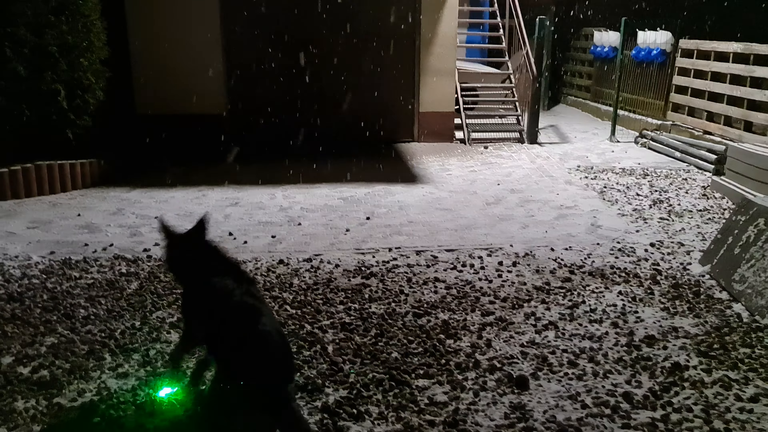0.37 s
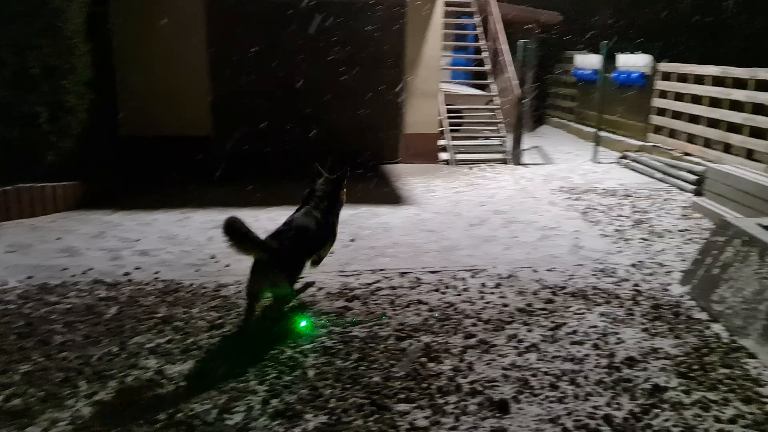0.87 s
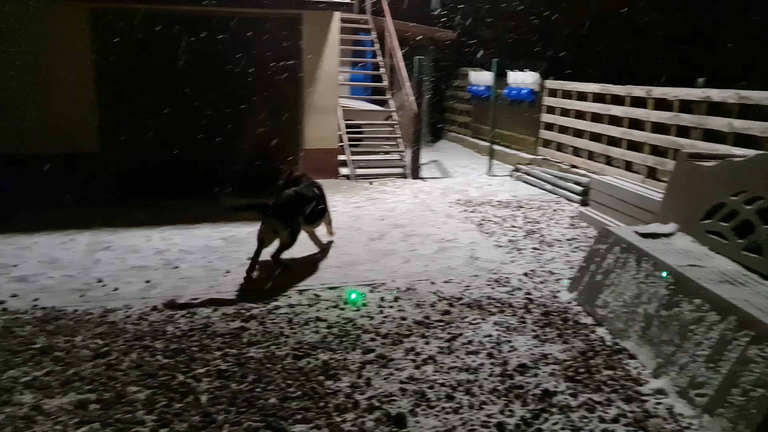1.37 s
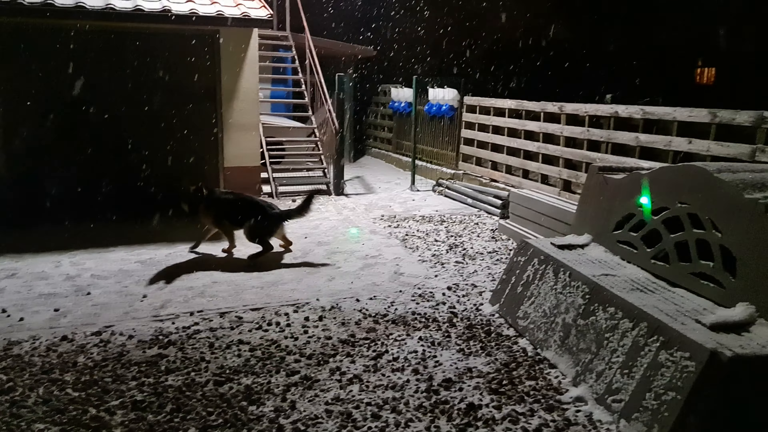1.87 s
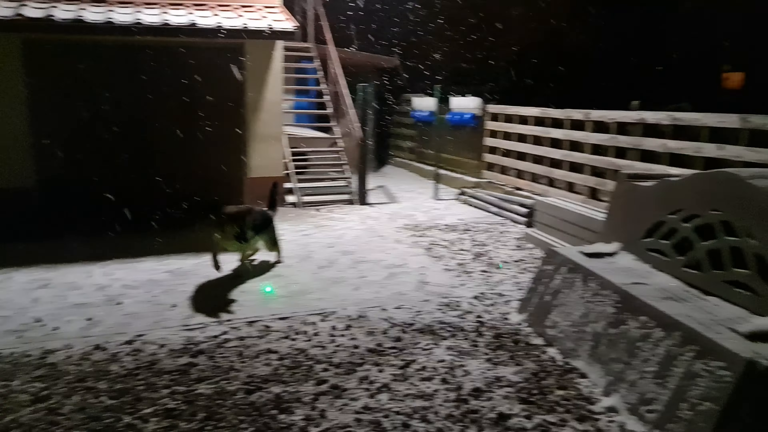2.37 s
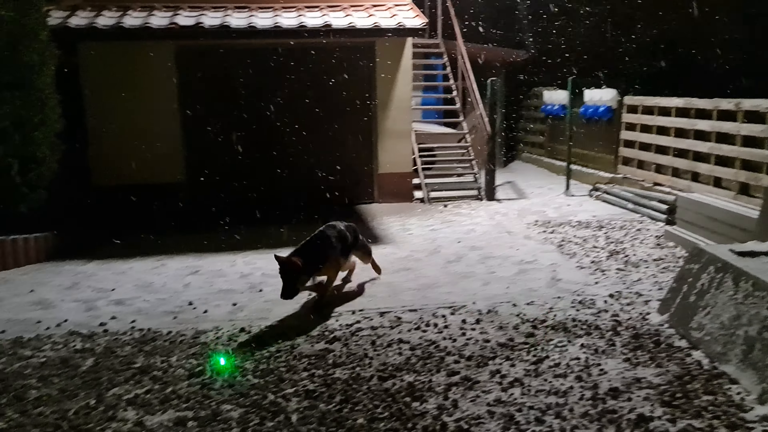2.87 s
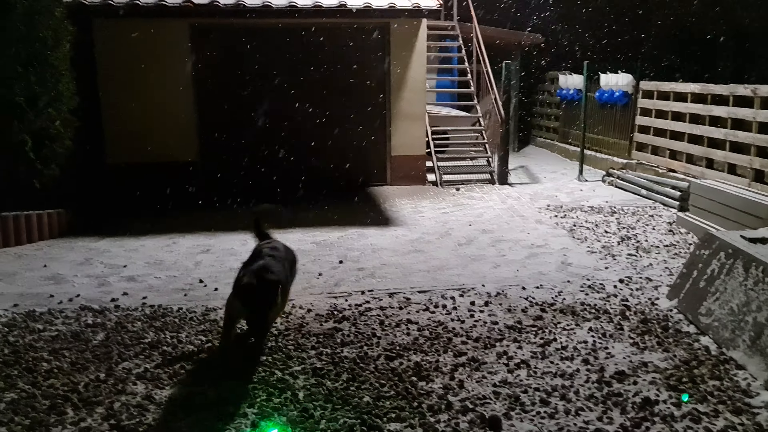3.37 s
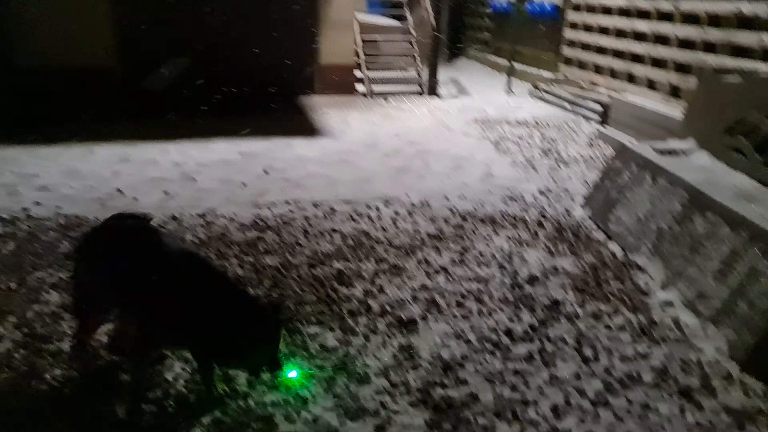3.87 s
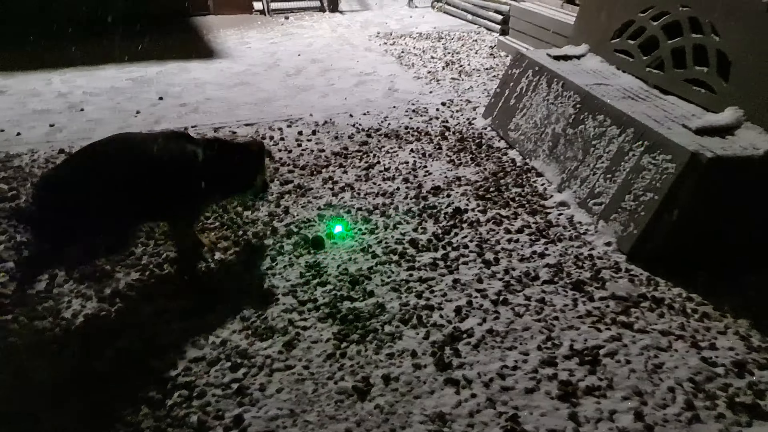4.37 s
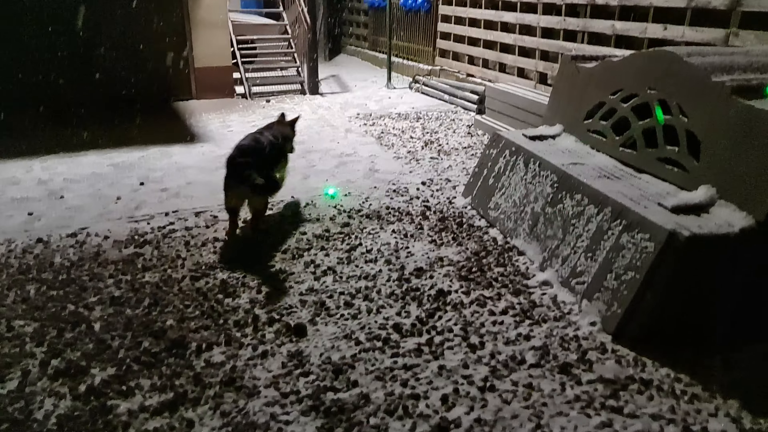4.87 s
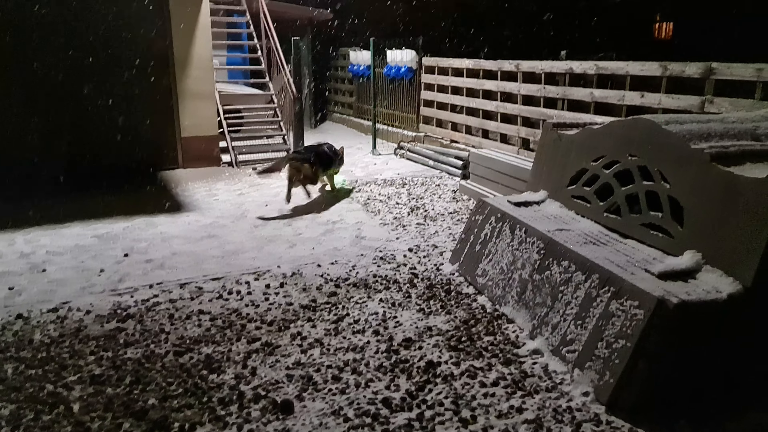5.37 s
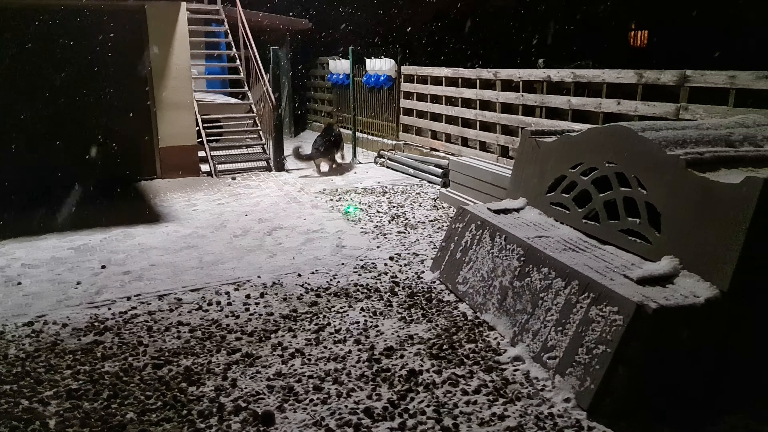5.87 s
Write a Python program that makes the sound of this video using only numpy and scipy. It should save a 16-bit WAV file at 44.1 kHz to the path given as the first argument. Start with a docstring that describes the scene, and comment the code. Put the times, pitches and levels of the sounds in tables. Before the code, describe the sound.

A dog scrambles noisily over snow-dusted gravel close by, runs off into near silence, then returns for a second crunching burst and fades away.

```python
"""Dog chasing about a walled yard at night

A dog runs over gravel under thin fresh snow: each step is grains set ringing, gravel bright and snow dull.
Near, its paws scatter stones that crunch and click, as short bursts into resonances, and its pads thud.
Far off the grains merge, and each step is a soft short hiss. Walls and fences scatter a little of it back.
Light wind, lumpy low noise, rumbles on the two microphone ports over a faint night floor of shaped noise."""
import sys
import numpy as np
from scipy import signal
from scipy.fft import rfft, irfft
from scipy.io import wavfile

SR = 44100
rng = np.random.default_rng(int(sys.argv[2]) if len(sys.argv) > 2 else 0)


def pcm_store(signal):
    """Save signal as 16-bit PCM."""
    levels = np.round(np.clip(np.atleast_2d(signal), -1, 1) * 32767)
    wavfile.write(sys.argv[1], SR, levels.astype(np.int16).T)


def level_to_linear(level):
    """Convert decibel levels to linear amplitude factors, elementwise."""
    exponent = np.asarray(level, float) / 20
    return 10 ** exponent


N = 275184
TIME = np.arange(N) / SR
LOW_EXTRA_LAG_MS = 0.26   # long waves bend round the body and lag more


def rms_one(x):
    """Scale to rms 1, all channels together."""
    return x / np.sqrt(np.mean(x ** 2) + 1e-20)


def peak_one(x):
    """Scale each row to peak 1."""
    return x / np.abs(x).max(axis=-1, keepdims=True)


def in_time(rows):
    """Each column after the first, the time, as a curve over all samples."""
    s, *columns = np.transpose(rows)
    return [np.interp(TIME, s, column) for column in columns]


def drift(corner_hz):
    """Slow chance of spread 1: noise through two equal poles, made at a fortieth of the sample rate."""
    pole = np.exp(-80 * np.pi * corner_hz / SR)
    white = rng.standard_normal(N // 40 + 2002)
    slow = signal.lfilter([1], [1, -2 * pole, pole * pole], white)[2000:]
    return np.interp(np.arange(N) / 40, np.arange(len(slow)), rms_one(slow))


def ring(x, hz, cycles):
    """A resonance that dies by 60 dB in so many cycles; a unit click rings at height about 1."""
    pole = level_to_linear(-60 * hz / (cycles * SR))
    w = 2 * np.pi * hz / SR
    return signal.lfilter([0, np.sin(w)], [1, -2 * pole * np.cos(w), pole * pole], x + 1e-18)


def above(x, hz):
    """Steep high-pass."""
    return signal.sosfilt(signal.butter(4, hz, "high", fs=SR, output="sos"), x)


def band(x, order, low_hz, high_hz):
    """Band-pass."""
    return signal.sosfilt(signal.butter(order, [low_hz, high_hz], "band", fs=SR, output="sos"), x)


def colour(x, spectrum):
    """Filter by a curve of (Hz, dB) points, read on a log-frequency axis."""
    hz = np.maximum(np.fft.rfftfreq(N, 1 / SR), 1)
    point_hz, point_db = np.transpose(spectrum)
    return irfft(rfft(x) * level_to_linear(np.interp(np.log(hz), np.log(point_hz), point_db)), N)


def at_ports(x, lag_ms):
    """Sound from one side reaches the right port a little later than the left."""
    return np.array([x, np.interp(TIME - lag_ms / 1000, TIME, x)])


def grains(per_s, spread_db, low_hz, high_hz, cycles, crack_db, count):
    """Random clicks of uneven size: each is a broad crack plus a ring in one of several resonances."""
    sizes = level_to_linear(spread_db * np.minimum(rng.exponential(1, N), 4)) * rng.choice([-1, 1], N)
    clicks = sizes * (rng.random(N) < per_s / SR) / np.sqrt(per_s)
    dealt = rng.integers(0, count, N)
    rings = 0
    for k, hz in enumerate(np.geomspace(low_hz, high_hz, count)):
        # grains of each size come and go on their own, so the colour shifts
        presence = hz * level_to_linear(4.9 * drift(13))
        rings = rings + presence * ring(clicks * (dealt == k), hz, cycles)
    scrape = irfft(np.exp(2j * np.pi * rng.random(20)))   # a contact lasts about a millisecond
    cracks = np.convolve(clicks, scrape, "same")
    return rms_one(rings) + level_to_linear(crack_db) * rms_one(cracks)


def knock(burst_ms):
    """Ragged bursts, one per row: the contact builds, peaks after burst_ms, then lets go."""
    t = np.arange(4096) / (np.reshape(burst_ms, (-1, 1)) * SR / 1000)
    return rng.standard_normal(t.shape) * t * np.exp(-t)


def lay(times, peaks_db, sounds):
    """Place each sound at its start time and peak height."""
    out = np.zeros(N + sounds.shape[1])
    for s, db, sound in zip(times, peaks_db, peak_one(sounds)):
        out[round(s * SR):][:len(sound)] += level_to_linear(db) * sound
    return out[:N]


def footfalls():
    """Gravel and snow levels in dB: steps swell, sag under the weight, die as the paw lifts; powers add."""
    # Each paw coming down. Each row: landing in seconds, press in seconds, gravel crunch in dB,
    # snow squeeze in dB.
    steps = [(.01, 0.021, -34.5, -42.5), (0.044, 0.048, -26, -34), (0.131, 0.075, -22.5, -30.5),
             (0.249, 0.1, -28, -37.5), (0.392, 0.05, -25.5, -35), (0.482, .07, -31.5, -44.5),
             (0.588, 0.078, -39.5, -45.5), (0.679, .05, -50.5, -51), (0.762, 0.026, -52, -46),
             (.82, 0.022, -53.5, -50.5), (0.936, 0.023, -61, -57.5), (1.012, 0.038, -56.5, -57.5),
             (1.129, 0.012, -66.5, -58.5), (1.251, 0.071, -59, -66), (1.451, 0.15, -63, -61.5),
             (1.56, 0.058, -54.5, -56.5), (1.66, .05, -59.5, -69), (1.79, 0.1, -69, -73),
             (1.869, 0.075, -57, -69.5), (1.977, 0.13, -55, -60.5), (2.208, 0.019, -65.5, -69),
             (2.586, 0.044, -52, -62), (2.732, 0.022, -65, -67), (2.884, 0.053, -58.5, -67.5),
             (3.06, .09, -68, -79), (3.173, 0.018, -57, -67), (3.313, 0.071, -57.5, -55),
             (3.508, .05, -59, -60), (3.681, .02, -41, -44.5), (3.712, 0.086, -26.5, -33.5),
             (3.86, 0.062, -39.5, -43.5), (3.972, 0.059, -33, -45.5), (4.074, 0.043, -31, -39),
             (4.173, .1, -35.5, -44), (4.301, .14, -35, -40.5), (4.458, 0.055, -42.5, -50),
             (4.533, 0.028, -33, -46), (4.564, 0.052, -36, -43.5), (4.66, 0.057, -46.5, -53.5),
             (4.779, 0.029, -52.5, -57.5), (4.858, 0.024, -61, -55), (4.916, 0.023, -62, -56),
             (4.98, .04, -66.5, -70), (5.072, 0.028, -61, -63), (5.152, 0.096, -69, -62.5),
             (5.286, 0.06, -62, -64.5), (5.52, 0.064, -66, -63), (5.632, 0.052, -61.5, -58.5),
             (5.721, 0.18, -59, -65), (5.828, 0.072, -57, -59), (5.931, 0.085, -56.5, -62.5),
             (6.06, .2, -62, -87)]
    lands, presses, crunch_db, squeeze_db = np.transpose(steps)[:, :, None]
    settling_db = -77.5   # loose grit never lies quite still
    coarse = TIME[::40]
    t = coarse - lands
    curves = []
    # rise, sag and release in dB per s
    for step_db, rise, sag, release in [(crunch_db, 1100, 9.6, 300), (squeeze_db, 1500, 41, 200)]:
        loss_db = rise * np.maximum(-t, 0) + sag * np.clip(t, 0, presses)
        loss_db = loss_db + release * np.maximum(t - presses, 0)
        power = np.sum(level_to_linear(step_db - loss_db) ** 2, axis=0) + level_to_linear(settling_db) ** 2
        curves.append(np.interp(TIME, coarse, 10 * np.log10(power)))
    return curves


def gravel(level_db, lag_ms, distance, sheen_db):
    """Three patches under the paws, each from its own direction; from afar the grains merge into hiss."""
    # Colour of the gravel. Each row: frequency in Hz, relative level in dB.
    gravel_colour = [(410, -15.5), (700, 2.5), (865, -5.5), (1000, -2.5), (1680, 2), (2180, 1), (2880, 0),
                     (3650, 4), (6300, 4), (9220, -14.5), (14500, -11), (16500, -64.5)]
    busy = np.maximum(450 * level_to_linear(0.5 * (level_db + 25)), 90)   # a harder scramble moves more stones
    out = 0
    for offset_ms in (-0.05, 0, 0.05):
        # stones give way in clumps, evened out beyond 5.4 m
        clumps = level_to_linear(3.2 * drift(60) * np.minimum(5.4 / distance, 1))
        bed = grains(busy * distance ** 2 * clumps, spread_db=2.2, low_hz=800, high_hz=15800,
                     cycles=3.1, crack_db=2, count=10)
        patch = clumps * rms_one(colour(bed, gravel_colour))
        out = out + at_ports(patch, lag_ms + offset_ms)
    sheen = above(out, 5200) * (level_to_linear(sheen_db) - 1)   # the treble brightens and dulls
    return level_to_linear(level_db) * rms_one(out + sheen)


def stones(lag_ms):
    """Single stones knock together: each has its own short ring, a broad click and a treble crack."""
    # Each row: start in seconds, peak in dB before the last high-pass, ring in Hz,
    # treble crack relative to the ring in dB.
    knocks = [(0.0201, -17, 6300, -17.5), (0.0446, -1, 4640, 1), (.0808, -14, 6020, -20),
              (0.0977, -16.5, 3456, -17.5), (0.106, -5, 4540, -23.5), (0.191, -14, 4570, -15),
              (.2391, -11.5, 4230, -21), (0.3488, -3, 6075, -22), (0.3633, -9.5, 5920, -18.5),
              (0.3659, -10.5, 4384, -26.5), (0.387, -7.5, 6040, -3.5), (0.4531, -11, 5550, -23.5),
              (0.4574, -11.5, 2890, -18.5), (0.4901, -7, 4840, -5.5), (0.5325, -5, 4646, -24.5),
              (0.5363, -2, 4100, -23), (0.5473, -15, 4780, -8), (0.5581, -17.5, 4410, -36),
              (0.5701, -13.5, 4930, -30), (0.5891, -15.5, 3520, -25), (0.6062, -17, 1770, -6.5),
              (0.6289, -18.5, 5400, -22.5), (0.654, -21.5, 5800, -27.5), (0.6622, -7, 6060, 2.5),
              (0.6877, -25, 6500, -28.5), (0.7255, -13, 6250, -16), (0.729, -18.5, 1430, -5),
              (0.751, -18.5, 5700, -44.5), (0.7695, -2, 6240, 7), (0.7735, -15.5, 6330, -2.5),
              (0.7951, -26.5, 3040, -4.5), (0.8311, -19, 5400, -1.5), (0.846, -41.5, 3500, -17),
              (0.853, -24.5, 5280, -28), (0.9016, -41, 3580, -30), (0.9974, -10.5, 6400, 1.5),
              (1.221, -30.5, 4530, -35), (1.226, -40.5, 3550, -22), (1.5702, -35.5, 3770, -24),
              (3.174, -45, 5500, -18), (3.185, -33, 5200, -27), (3.195, -35, 5420, -28),
              (3.3375, -22, 5400, -29.5), (3.339, -27.5, 2520, -25.5), (3.3656, -33, 2450, -31),
              (3.6714, -24, 5380, -25), (3.678, -16, 5540, -30), (3.6875, -14.5, 5500, -31),
              (3.7158, -14.5, 5440, -26.5), (3.7325, -6, 5600, -36), (3.7521, -16, 5430, -33),
              (3.8058, -8, 5090, -10), (3.869, -13, 6200, -12), (3.909, -32, 3250, -26),
              (3.9408, -9, 6130, -22.5), (3.9482, -12, 6500, 0), (3.9568, -25, 5640, -23),
              (3.987, -18, 4500, -15), (4.0306, -9.5, 4800, -14), (4.074, -8.5, 5500, -1),
              (4.0888, -26, 4430, -14.5), (4.1, -19, 3480, -17.5), (4.116, -15, 3460, -1.5),
              (4.1563, -15, 6540, -12), (4.1747, -17, 5460, -27), (4.185, -7.5, 5400, -14.5),
              (4.329, -19.5, 3680, -30), (4.3983, -13, 4700, -29), (4.4378, -13.5, 3800, -37.5),
              (4.484, -8.5, 5440, -16.5), (4.5137, -18, 3070, -23), (4.535, -24, 5540, -27),
              (4.538, -12.5, 2010, -22), (4.6051, -17, 4170, -21), (4.654, -25, 3610, -27),
              (4.6858, -30.5, 3650, -30), (4.7213, -30.5, 4960, -31), (4.7486, -24.5, 3860, -41),
              (4.785, -35.5, 1660, -34), (4.799, -25.5, 5190, -40), (4.8579, -25.5, 5070, -45),
              (4.8707, -38, 4130, -30), (4.912, -32.5, 4070, -41), (5.2269, -32.5, 4580, 13),
              (5.8421, -35.5, 1920, -30)]
    s, peak_db, hz, crack_db = np.transpose(knocks)
    ring_s, broad_db = 0.0046, -3
    bursts = knock(np.full(len(s), 0.33))
    rings = np.array([ring(burst, f, f * ring_s) for burst, f in zip(bursts, hz)])
    broad = band(knock(np.full(len(s), 0.078)), 4, 1300, 7000)
    cracks = above(bursts, 10000)
    sounds = peak_one(rings) + level_to_linear(broad_db) * peak_one(broad)
    sounds = sounds + level_to_linear(crack_db[:, None]) * peak_one(cracks)
    return at_ports(above(lay(s, peak_db, sounds), 1000), lag_ms)


def pebbles(level_db, lag_ms, distance, usual_hz):
    """Small stones chink in flurries through paired resonances; those near the usual pitch are loudest."""
    under_crunch_db = -5
    rate = 190 * distance * level_to_linear(3 * drift(25))   # per s, more of them for each metre of distance
    sizes = level_to_linear(3 * np.minimum(rng.exponential(1, N), 3))
    clicks = sizes * (rng.random(N) < rate / SR)
    dealt = rng.integers(0, 12, N)
    chinks = 0
    for k, hz in enumerate(np.geomspace(2800, 6600, 12)):
        # two resonances in a row let a chink swell and die in a millisecond or two
        chink = ring(ring(clicks * (dealt == k), hz, 6), hz, 6)
        chinks = chinks + level_to_linear(-30 * np.log2(hz / usual_hz) ** 2) * rms_one(chink)
    return level_to_linear(level_db + under_crunch_db) * at_ports(rms_one(above(chinks, 2000)), lag_ms)


def quick_echo(x, share):
    """A surface close to the microphone returns an inverted echo that hollows 2.3 and 4.6 kHz."""
    echo = np.roll(x, round(0.44 * SR / 1000), axis=1)   # 0.44 ms late
    return (x - share * echo) / np.sqrt(1 + share ** 2)


def snow(level_db, lag_ms):
    """Snow packs under the pads in duller, larger creaks."""
    # Colour of the snow. Each row: frequency in Hz, relative level in dB.
    snow_colour = [(120, -4.5), (220, 6), (450, -1), (800, 5), (1400, 1), (2200, 2)]
    creaks = grains(900 * level_to_linear(2.9 * drift(25)), spread_db=3.4, low_hz=151, high_hz=2450,
                    cycles=5.3, crack_db=-30.5, count=8)
    creaks = rms_one(colour(creaks, snow_colour))
    return level_to_linear(level_db) * at_ports(creaks, lag_ms + LOW_EXTRA_LAG_MS)


def thuds(lag_ms):
    """A pad lands hard or slides: a dull burst into a low, wide ring, with little below half its pitch."""
    # Each row: start in seconds, peak in dB, ring in Hz, contact in ms.
    landings = [(0.767, -34.5, 248, 0.067), (2.733, -47.5, 317, 3.8), (2.925, -50.5, 710, 23),
                (3.8563, -18, 700, 1.6), (3.8632, -25, 800, 1.2), (3.8689, -14, 870, 2.7),
                (3.870, -29, 400, 2.2), (3.892, -38, 410, 3.5), (3.895, -31.5, 700, 7.6),
                (5.905, -50, 800, 17)]
    s, peak_db, hz, burst_ms = np.transpose(landings)
    ring_s = 0.011
    dull = signal.sosfilt(signal.butter(2, 1400, fs=SR, output="sos"), knock(burst_ms))
    rings = np.array([above(ring(burst, f, f * ring_s), f / 2) for burst, f in zip(dull, hz)])
    return at_ports(lay(s, peak_db, rings), lag_ms + LOW_EXTRA_LAG_MS)


def yard(x):
    """A short dull scatter off fences and walls, decaying noise that differs at each port."""
    t60_s, scatter_db = 0.098, -17.5
    t = TIME[:round(0.25 * SR)]
    dull = signal.lfilter([0.5], [1, -0.5], rng.standard_normal((2, len(t))))
    scatter = dull * level_to_linear(-60 * t / t60_s) * (t > 0.004)
    scatter *= level_to_linear(scatter_db) / np.sqrt(np.sum(scatter ** 2, axis=1, keepdims=True))
    return signal.fftconvolve(x, scatter, axes=1)[:, :N]


def wind():
    """Lumpy low noise, partly its own at each port; a little higher up both ports move together."""
    # Slow level curve of the low wind noise. Each row: time in seconds, level in dB before the lumps.
    wind_level = [(0.0, -66), (0.05, -54.5), (0.5, -57), (0.61, -47.5), (0.71, -63), (1.22, -49.5),
                  (1.29, -61), (2.03, -56), (2.05, -50), (2.19, -63), (3.63, -63), (4.24, -57.5),
                  (4.34, -49.5), (5.13, -54), (5.39, -64.5), (5.56, -55), (6.24, -66.5)]
    white = rng.standard_normal((3, N))
    own = band(white[:2], 2, 34, 70)
    shared = band(white[2], 2, 55, 105)
    lumps_db = 2.2 * drift(7)
    return level_to_linear(in_time(wind_level)[0] + lumps_db) * rms_one(own + 0.51 * shared)


def night():
    """A faint steady floor: shaped noise, partly shared by the two ports."""
    # Colour of the night floor. Each row: frequency in Hz, relative level in dB.
    night_colour = [(100, -40.5), (141, -10), (297, 6), (496, -1), (2360, -9), (5790, -51), (7650, -32),
                    (14800, -25.5)]
    hush = rng.standard_normal((3, N))
    return level_to_linear(-69.5) * rms_one(colour(hush[:2] + 0.51 * hush[2], night_colour))


def scene():
    """The dog, its scatter off the yard, the night and the wind at the two ports."""
    # Where the dog is. Each row: time in seconds, lag of the right port behind the left in ms,
    # distance in metres, treble sheen of the crunch above 5.2 kHz in dB,
    # share of the quick echo from 0 to 1, usual pitch of the pebbles there in Hz.
    path = [(0, 0.03, 2.1, 1, 0, 4860), (.5, 0.07, 2, -3.5, 0, 4900), (1.0, 0.39, 4, 1.5, 0, 5300),
            (1.8, 0.11, 6, 5.5, 0.03, 4106), (2.6, 0.099, 5, -3, 0, 3970), (2.9, .03, 4.6, 2.5, 0.36, 5600),
            (3.2, 0.074, 3.7, 0, 0.33, 5296), (3.7, 0.11, 2.1, 1, 0.26, 5680),
            (4.0, 0.25, 1.8, -2.5, 0.15, 5230), (4.35, 0.27, 2.5, -3.5, 0, 3800),
            (4.75, 0.19, 3.5, 1, 0.15, 4530), (6.24, 0.044, 9.9, 2.5, 0.14, 3700)]
    lag_ms, distance, sheen_db, echo_share, pebble_hz = in_time(path)
    crunch_db, squeeze_db = footfalls()
    grit = gravel(crunch_db, lag_ms, distance, sheen_db) + stones(lag_ms)
    grit = grit + pebbles(crunch_db, lag_ms, distance, pebble_hz)
    dog = quick_echo(grit, echo_share) + snow(squeeze_db, lag_ms) + thuds(lag_ms)
    return dog + yard(dog) + night() + wind()


def low_pass(x):
    """Removes everything above the highest recorded frequency."""
    return signal.sosfilt(signal.butter(12, 17000, fs=SR, output="sos"), x)


def record(dry):
    """The two ports differ in colour, peaks are rounded and the top is cut."""
    # Difference between the ports. Each row: frequency in Hz, left over right in dB.
    port_colour = [(60, -2), (300, -3.5), (650, 0), (2100, 2), (3000, -3.5), (5600, -3.5), (6900, 1.5),
                   (7900, 2), (9400, 2.5), (12000, -2.5)]
    half = np.array(port_colour) * [1, 0.5]   # each port takes half the difference
    ports = np.array([colour(dry[0], half), colour(dry[1], half * [1, -1])])
    ports = 0.8 * np.tanh(ports / 0.8)
    ports = signal.sosfilt(signal.butter(10, 15600, fs=SR, output="sos"), ports)
    return low_pass(ports)


dry = scene()
out = record(dry)
pcm_store(out)
```